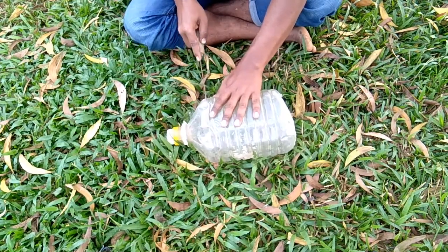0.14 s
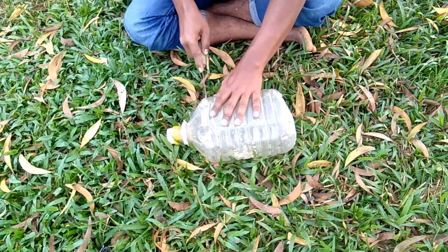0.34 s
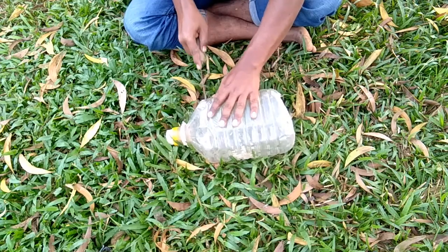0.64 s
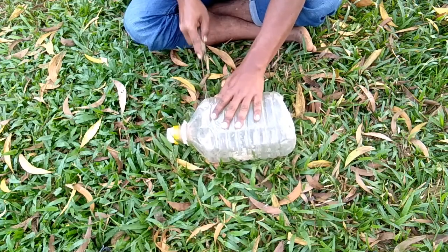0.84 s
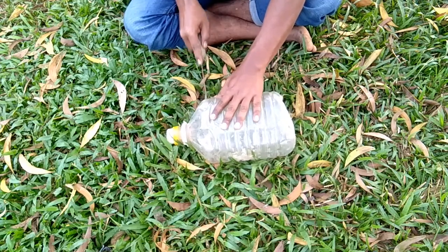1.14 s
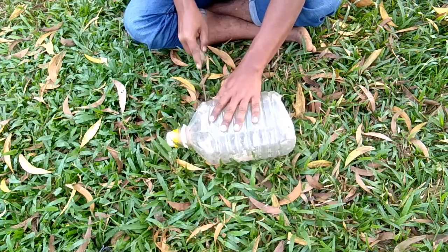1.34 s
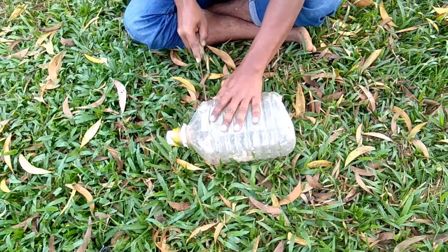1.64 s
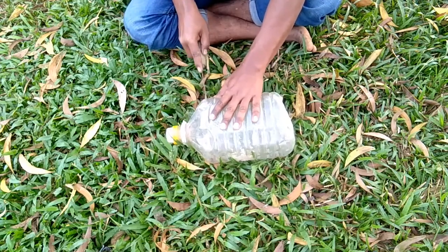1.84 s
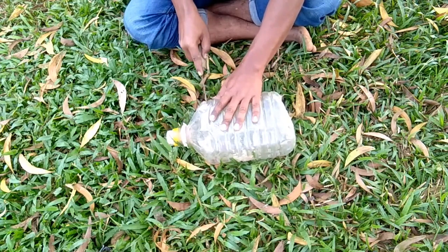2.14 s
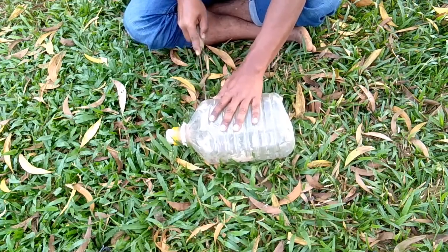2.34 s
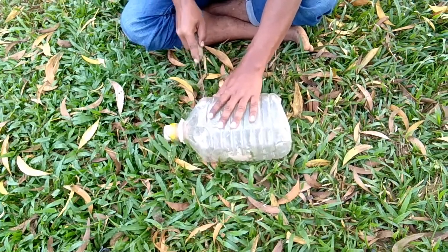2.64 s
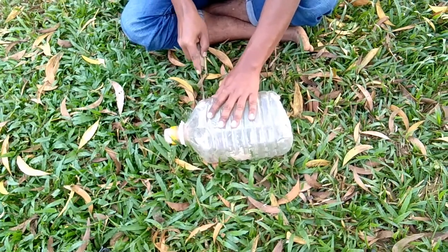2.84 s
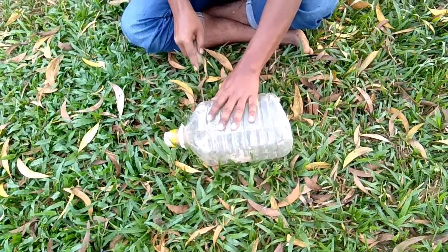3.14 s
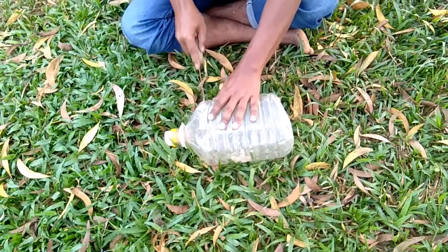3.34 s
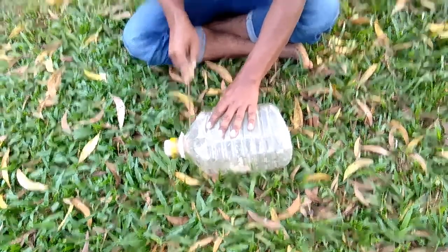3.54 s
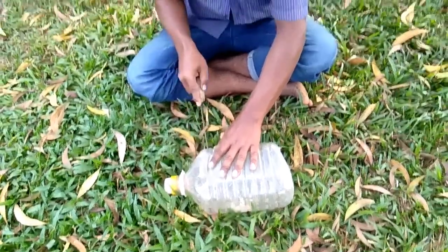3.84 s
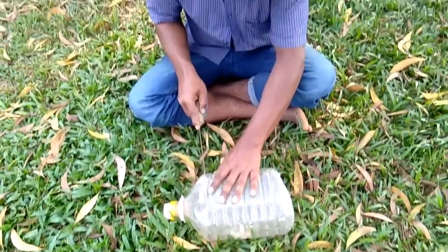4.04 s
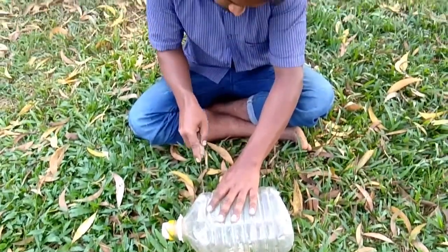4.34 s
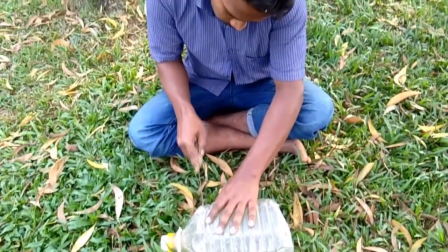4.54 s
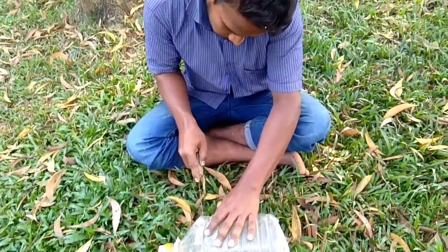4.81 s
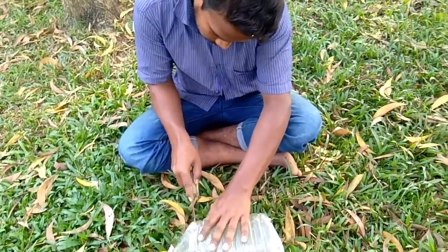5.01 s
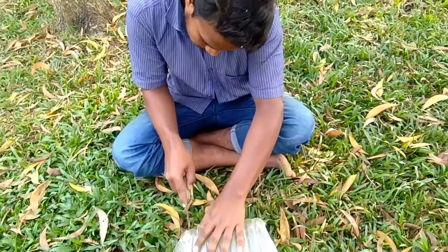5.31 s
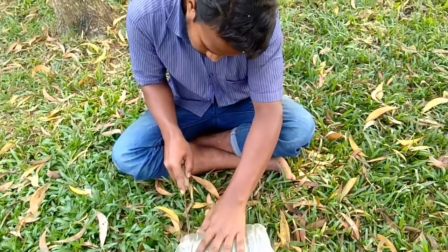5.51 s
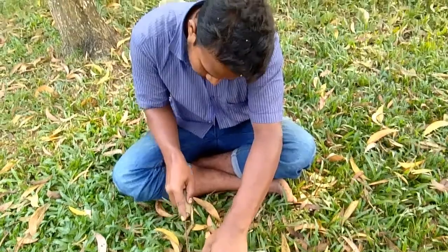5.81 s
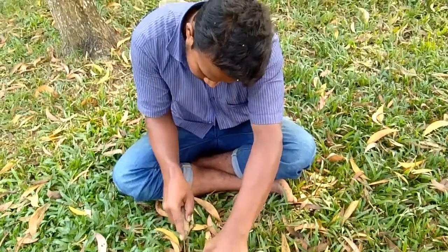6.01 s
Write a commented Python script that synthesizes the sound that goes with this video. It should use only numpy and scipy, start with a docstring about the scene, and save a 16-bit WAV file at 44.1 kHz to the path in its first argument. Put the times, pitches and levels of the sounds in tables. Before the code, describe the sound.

Close, dry rasping of saw teeth on hollow plastic, outdoors on grass. Steady to-and-fro strokes, the forward ones splintery and bright, the backward ones duller, with little snaps where the blade catches and soft boomy thuds from the hand-damped bottle. After a short pause with faint bird chirps, sawing returns, its back strokes now stronger, and is cut off mid-rhythm. Almost no echo, faint open-air hush.

```python
"""A dull scrape is already under way: a small saw blade slides back and forth through a thin plastic bottle.
A hand holds the bottle down on a lawn. Each tooth plucks the wall, which rings through filters for the bottle.
Bright cuts mostly take turns with dull returns, with ticks, chips and low thuds; the sawing rests once, half-way.
Birds, made of gliding sine tones, whistle some way off over a quiet outdoor hush of filtered noise."""
import sys
import numpy as np
from scipy import signal
from scipy.fft import rfft, irfft, next_fast_len
from scipy.io import wavfile
from scipy.ndimage import map_coordinates

SR = 44100
rng = np.random.default_rng(int(sys.argv[2]) if len(sys.argv) > 2 else 0)


def wrap_up_sound(samples):
    """Save the sound to the file named by the first command line argument, as 16-bit audio."""
    columns = np.atleast_2d(samples).T
    # keep every value between -1 and 1, then stretch to whole-number steps
    tamed = np.clip(columns, -1, 1)
    steps = np.round(tamed * 32767).astype(np.int16)
    wavfile.write(sys.argv[1], SR, steps)


N = 272097  # length in samples
USUAL_DB = -29  # push level of a stroke of middling force


def amp(db):
    """Turn decibels into a gain."""
    return 10 ** (np.asarray(db) / 20)


def unit(x):
    """Scale x to an rms of 1."""
    return x / np.sqrt(np.mean(x ** 2) + 1e-20)


def along(points, hz):
    """Read a table of (f/Hz, value) on a log frequency axis."""
    f, value = np.transpose(points)
    return np.interp(np.log(hz + 1), np.log(f), value)


def wobble(rate, size):
    """A smooth random curve through `rate` random points a second."""
    points = rng.standard_normal(int(size * rate / SR) + 4)
    return map_coordinates(points, [np.arange(size) * rate / SR])


def add(track, s, sound):
    """Mix a sound into the track at time s, dropping what falls outside."""
    first = round(s * SR)
    sound = sound[max(-first, 0):]
    part = track[max(first, 0):][:len(sound)]
    part += sound[:len(part)]  # part is a view, so this changes the track


def filtered(x, gain):
    """Multiply the spectrum of x by a gain that depends on frequency."""
    size = next_fast_len(N + SR // 2)
    hz = np.fft.rfftfreq(size, 1 / SR)
    return irfft(rfft(x, size) * gain(hz), size)[:N]


def causal(colour_db, size=4096):
    """A response of energy 1 with the given colour, its sound packed as early as possible (minimum phase)."""
    hz = np.fft.rfftfreq(size, 1 / SR)
    cepstrum = irfft(np.log(amp(colour_db(hz))))
    fold = np.r_[1, np.full(size // 2 - 1, 2), np.zeros(size // 2)]
    response = irfft(np.exp(rfft(cepstrum * fold)))
    return response / np.linalg.norm(response)


def ringing(decays, size):
    """Many random modes of equal energy, each frequency dying away at its own speed."""
    hz, t, modes = signal.stft(rng.standard_normal(size), SR, nperseg=128)
    fade = amp(-60 * t / along(decays, hz)[:, None])
    even_fade = fade / np.linalg.norm(fade, axis=1, keepdims=True)
    tail = signal.istft(modes * even_fade, SR)[1][:size]
    return tail / np.linalg.norm(tail)


# how loudly the bottle wall passes on a scrape at each pitch: f/Hz, relative level/dB
WALL_COLOUR = [(100, -34), (250, -24), (390, -2), (500, -5.5), (680, 2.5), (1300, -2.5), (1900, -2.5),
               (3400, -11), (5500, -24), (9500, -26.5), (12500, -39.5), (16000, -46.5)]
# resonances of the bottle that stand out: f/Hz, width/Hz, boost level/dB
RESONANCES = [(180, 44, 0), (367, 23, 0.5), (1117, 57, 5), (1744, 240, 4), (2800, 230, 2), (4360, 18, 5),
              (4500, 870, 3), (6110, 59, 5), (8890, 340, 1)]


def bottle(spectrum, bright_db=0, peaks=()):
    """The bottle's response for one grip and blade angle: a colour, a treble tilt and resonant bumps."""
    def colour_db(hz):
        tilt = along([(700, 0), (4000, bright_db)], hz)
        bumps = 0
        for centre, width, db in [*RESONANCES, *peaks]:
            bumps = bumps + db * np.exp(-((hz - centre) / width) ** 2)
        return along(spectrum, hz) + tilt + bumps
    return causal(colour_db)


# how long the plucked wall rings: f/Hz, time to fall by 60 dB t/s
WALL_RING = [(170, 0.049), (400, 0.091), (1000, 0.039), (3000, 0.039), (10000, 0.028)]


def pluck(crack):
    """One spot of the wall let go: a sharp crack, then its ring."""
    ring = ringing(WALL_RING, size=4096)
    ring[0] += crack
    return ring / np.linalg.norm(ring)


def teeth(speed, tooth_rate, jitter, scatter_db):
    """Sample places and sizes of the teeth passing the edge; tooth_rate is per second at speed 1."""
    travel = np.cumsum(speed) * tooth_rate / SR
    chance = rng.standard_normal((int(travel[-1]), 2))
    passing = np.arange(len(chance)) + jitter * chance[:, 0]
    at = np.searchsorted(travel, passing).clip(0, len(speed) - 1)
    size = amp(scatter_db * np.minimum(chance[:, 1], 2))
    # sparser teeth pluck harder, which keeps the overall level
    return at, unit(size) * np.sqrt(SR / (tooth_rate * speed[at]))


def rasp(force, speed, tooth_rate, scatter_db, crack, count=6):
    """Teeth pluck a few spots, each with a ring of its own; the contact moves on as the blade travels."""
    at, size = teeth(speed, tooth_rate, jitter=.3, scatter_db=scatter_db)
    stray = .55  # how far a tooth may miss its spot, in spots
    spot = np.floor(count * at / len(force) + stray * rng.standard_normal(len(at))) % count
    total = 0
    for k in range(count):
        hits = np.bincount(at, size * (spot == k), len(force))
        total = total + signal.fftconvolve(force * hits, pluck(crack))
    return total


# colour of the outdoor background: f/Hz, relative level/dB
AIR_COLOUR = [(15, -40.5), (25, -0.5), (86, 3.5), (354, -11.5), (1810, -11.5), (3010, -9), (3440, -17.5),
              (15000, -32.5)]


def air():
    """A steady, very quiet outdoor hush made of filtered noise."""
    hush = filtered(rng.standard_normal(N), lambda hz: amp(along(AIR_COLOUR, hz)))
    return amp(-75.0) * unit(hush)


# when the blade lies in the cut and rubs, also between strokes: start t/s, end t/s, level/dB
RUBS = [(0, 3.58, -58.5), (4.35, 6.17, -59)]


def rubbing():
    """The flat of the blade slides unevenly against the cut: noise coloured by the bottle."""
    t = np.arange(N) / SR
    slide = signal.fftconvolve(rng.standard_normal(N), bottle(WALL_COLOUR, bright_db=8))[:N]
    fade_db_per_s = 700
    contact = 0
    for start, end, db in RUBS:
        outside_s = np.abs(t - np.clip(t, start, end))
        contact = contact + amp(db - fade_db_per_s * outside_s)
    return contact * amp(1.1 * wobble(65, N)) * slide


def stroke_force(t, start, end, db, lean_db, arch):
    """The blade bites, the push swells to its crest, and the teeth come free."""
    crest_share, start_drop_db, end_drop_db, release_db_per_s = arch
    bite_s = 0.0035
    arch_grows = 0.046  # a harder stroke starts further below its crest: share gained per dB of push
    start_drop_db = start_drop_db * max(1 + arch_grows * (db - USUAL_DB), .5)
    u = np.clip((t - start) / (end - start), 0, 1)  # progress through the stroke
    rise = np.interp(u, [0, crest_share], [1, 0]) ** 2
    fall = np.interp(u, [crest_share, 1], [0, 1]) ** 2
    push_db = db + lean_db * (u - crest_share) - start_drop_db * rise - end_drop_db * fall
    push_db = push_db - release_db_per_s * np.maximum(t - end, 0)
    uneven_db = 0.71 * wobble(75.6, len(t))
    return amp(push_db + uneven_db) * np.minimum((t - t[0]) / bite_s, 1)


# colour of the whole bottle's slow flexing: f/Hz, relative level/dB
FLEX_COLOUR = [(30, -40.5), (75, -16), (125, -15), (175, 1.5), (250, -3.5), (390, -3), (520, -22),
               (1200, -48.5)]
# colour of tiny chips breaking from the cut edge: f/Hz, relative level/dB
CHIP_COLOUR = [(300, -40.5), (1500, 4.5), (4300, 2), (5600, -6), (7800, -0.5), (9300, 1), (11000, -5),
               (12800, -15.5), (16000, -27.5)]
# colour of the rasping cut edge: f/Hz, relative level/dB
EDGE_COLOUR = [(500, -33.5), (1400, -0.5), (2100, -0.5), (2900, -4), (3600, -17.5), (8000, -28),
               (16000, -54)]


def stroke(start, end, db, lean_db, wall_hz, wall_db, crackle_db, bright_db, arch):
    """One stroke scrapes the wall, rasps its edge, flexes the bottle and breaks off chips."""
    t = np.arange(start - .002, end + .06, 1 / SR)
    force = stroke_force(t, start, end, db, lean_db, arch)
    usual = np.sqrt(np.mean(force[t < end] ** 2))
    push = force / usual
    harder_db = db - USUAL_DB
    speed = .4 + .6 * np.sin(np.linspace(0, np.pi, len(t)))  # fastest in mid-stroke

    scrape = amp(-0.7) * rasp(force, speed, tooth_rate=950, scatter_db=5.0, crack=.22)
    wall_grows = .5  # the resonance near the blade stands out more under a hard push
    wall_db = wall_db * amp(wall_grows * harder_db)
    brightens_db_per_s = 0.93  # as the cut goes on
    wall_peak = (wall_hz, 0.15 * wall_hz, wall_db)
    wall = bottle(WALL_COLOUR, bright_db + brightens_db_per_s * start, [wall_peak])

    # the edge rasps mostly at the crest of the push, and more in harder strokes
    edge_level = amp(-11 + 0.58 * harder_db) * usual
    edge = edge_level * rasp(push ** 2.37, speed, tooth_rate=700, scatter_db=4, crack=0.28, count=2)

    # even a light push flexes the bottle, up to a limit set by the stroke's own level
    boom_db = min(-38.5 + .25 * harder_db, db - 4)
    boom = amp(boom_db) * rasp(push ** 0.5, speed, tooth_rate=900, scatter_db=2.0, crack=0.25, count=3)

    # a louder crackle also has more chips a second; most energy comes where the push is hard
    chip_rate = 560 * amp(.35 * crackle_db)
    chip_level = amp(crackle_db + 3.0) * usual
    chips = chip_level * rasp(push ** 1.46, speed, chip_rate, scatter_db=5, crack=0.49, count=4)

    parts = [(scrape, wall), (edge, bottle(EDGE_COLOUR)),
             (boom, bottle(FLEX_COLOUR)), (chips, bottle(CHIP_COLOUR))]
    return sum(signal.fftconvolve(drive, response) for drive, response in parts)


# return strokes, the backs of the teeth sliding over the edge:
# start t/s, end t/s, push level/dB, lean (extra push gained along the stroke) level/dB, wall resonance f/Hz
RETURNS = [(-.04, 0.062, -29.5, 0.5, 780), (.323, 0.449, -27.5, 0.5, 1700), (0.701, 0.828, -30, 6, 1643),
           (1.066, 1.186, -30.5, 2.5, 1610), (1.399, 1.548, -31, 3, 2700), (1.784, 1.9, -30, 2, 2530),
           (2.134, 2.267, -28, -3, 2110), (2.509, 2.634, -24.5, 3.5, 2370),
           (2.904, 3.012, -29.5, 2.5, 1620), (3.215, 3.377, -22, -4, 2530), (3.941, 3.985, -54, -1, 1060),
           (4.092, 4.199, -54.5, -1, 764), (4.236, 4.418, -29, 3, 790), (4.643, 4.756, -21.5, 2, 773),
           (5.007, 5.101, -23.5, 0, 2660), (5.341, 5.445, -20.5, -9, 2150),
           (5.681, 5.789, -23.5, -1.5, 2200), (6.043, 6.155, -26.5, 1.5, 2190)]
# cutting strokes, teeth first:
# start t/s, end t/s, push level/dB, lean level/dB, crackle relative level/dB, wall resonance f/Hz
CUTS = [(0.143, 0.219, -32, 12, -19, 2000), (0.206, .264, -24, 7, -5, 1520),
        (0.544, 0.629, -22.5, 8.5, -8, 4210), (.904, 1.014, -23.5, -0.5, -12.5, 4300),
        (1.253, 1.357, -24, 0, -15.5, 4170), (1.623, 1.717, -24, 0, -18.5, 4400),
        (1.98, 2.08, -23, -3.5, -13.5, 4500), (2.338, 2.455, -24, -1, -16.5, 4570),
        (2.733, 2.821, -26.5, 1.5, -21.5, 610), (3.058, 3.166, -24.5, 2.5, -17, 1100),
        (3.432, 3.549, -26, 5, -15.5, 2210), (4.481, 4.574, -29.5, -4, -16.5, 2190),
        (4.816, 4.932, -27.5, 9, -18, 620), (5.144, 5.274, -26, 10.5, -18, 1100),
        (5.516, 5.62, -25, 1, -19.5, 1160), (5.871, 5.973, -26, 0, -17, 1110)]
# the arch of a stroke: crest as a share of its length, drop at the start level/dB (for a middling push),
# drop at the end level/dB, release [dB per s]
RETURN_ARCH = (0.36, 6.8, 4.1, 1210)
CUT_ARCH = (.35, 7, 9.5, 620)


def sawing():
    """Bright cuts and dull returns; the teeth's plucks drive the bottle's wall, edge and body."""
    track, lead_s = np.zeros(N), .005
    for start, end, db, lean_db, wall_hz in RETURNS:
        wall_db = 1 + .9 * start  # the lengthening cut frees the wall
        sound = stroke(start, end, db, lean_db, wall_hz, wall_db,
                       crackle_db=-22, bright_db=-6.5, arch=RETURN_ARCH)
        add(track, start - lead_s, sound)
    for start, end, db, lean_db, crackle_db, wall_hz in CUTS:
        bright_db = -1.5 + 0.37 * (crackle_db + 12)  # brighter where the edge splinters
        sound = stroke(start, end, db, lean_db, wall_hz, 4, crackle_db, bright_db, CUT_ARCH)
        add(track, start - lead_s, sound)
    return track


# catches of the blade, where the wall snaps back: t/s, relative level/dB, relative splinter level/dB
SNAGS = [(0.114, -37, -38), (0.156, -21, -13.5), (0.313, -31, -5.5), (0.336, -20.5, -22), (0.347, -31, -20),
         (0.502, -16.5, -8), (0.546, -13, -15), (0.908, -12, -28), (1.07, -18, -31), (1.261, -21, -9.5),
         (1.603, -34, -45), (1.78, -22, -27), (2.13, -21, -24), (2.491, -18, -33), (2.712, -15.5, -21),
         (2.731, -10, -17.5), (2.883, -18.5, -21), (3.544, -12.5, -16), (3.932, -30.5, -51),
         (4.112, -34.5, -45), (4.234, -27, -29), (4.257, -27, -10), (4.458, -27.5, -60), (4.486, -23, -6.5),
         (4.557, -21, -17), (4.73, -19.5, -7), (4.815, -13.5, -27.5), (4.989, -20, -23), (5.149, -13, -23),
         (5.318, -29, -24), (5.357, -34, -21.5), (5.501, -19.5, -28), (5.848, -13.5, -20.5),
         (6.041, -21.5, -18)]


def snags():
    """A caught tooth bends the wall, which snaps back with a hollow tick as the next teeth skip past."""
    track, t = np.zeros(N), np.arange(SR // 40) / SR
    skip_t60 = 0.027  # seconds for the skipping to fall by 60 dB
    for s, db, treble_db in SNAGS:
        boom_db = -11.5 - 0.46 * (db - USUAL_DB)  # the flexing's share falls as the catch gets harder
        skip_force = amp(-60 * t / skip_t60)
        skips = 0.029 * rasp(skip_force, np.ones(len(t)), tooth_rate=1200, scatter_db=2.5, crack=0.24, count=2)
        add(skips, 0, 0.77 * pluck(crack=0.37))
        # more splintering also brightens the wall
        wall = bottle(WALL_COLOUR, bright_db=0.52 * (treble_db + 22.0))
        flex = amp(boom_db + 6.5) * bottle(FLEX_COLOUR)
        chips = amp(treble_db + 3) * bottle(CHIP_COLOUR)
        add(track, s, amp(db + 18.5) * signal.fftconvolve(skips, wall + flex + chips))
    return track


# bird notes, each one glide: start t/s, end t/s, first f/Hz, last f/Hz, level/dB, hoarseness (0 is pure)
BIRDS = [(0.121, .16, 4400, 4950, -53, 1.1), (0.268, 0.317, 3130, 2950, -56, 0.2),
         (1.0, 1.05, 3680, 3560, -59, .15), (1.199, 1.234, 4150, 4450, -53, 0.5),
         (1.227, 1.254, 4400, 3170, -54, .15), (1.928, 1.97, 3720, 4660, -62.5, .15),
         (3.64, 3.719, 2380, 2600, -72.5, 0.1), (3.725, 3.823, 2620, 3030, -74, .05),
         (3.839, 3.925, 2980, 3250, -91, .1), (4.111, 4.228, 2780, 3310, -60.5, 0.7),
         (4.423, 4.48, 2510, 2710, -57, 0.7)]


def birds():
    """Thin gliding whistles: sine tones whose fast random quaver makes some of them hoarse."""
    track = np.zeros(N)
    for start, end, first_hz, last_hz, db, hoarse in BIRDS:
        size = round((end - start) * SR)
        quaver = .08 * hoarse * wobble(900, size)
        glide = np.linspace(1, 0, size) ** 1.9  # slides fast at first, then settles
        pitch = (last_hz + (first_hz - last_hz) * glide) * (1 + quaver)
        level = amp(db) * signal.windows.tukey(size, .35)
        whistle = np.sin(2 * np.pi * np.cumsum(pitch) / SR)
        add(track, start, np.sqrt(2) * level * whistle)
    return track


# dull thuds as the whole side of the bottle gives way: t/s, f/Hz, level/dB before attack and decay
THUDS = [(0.546, 205, -23), (1.256, 197, -25), (2.713, 220, -21.5), (3.434, 175.4, -16),
         (3.934, 180, -30.5), (4.76, 205, -25.5), (5.099, 189, -26.5)]


def thuds():
    """The broad side swings at a low pitch for a few cycles, damped by the hand."""
    track, t = np.zeros(N), np.arange(SR // 5) / SR
    attack_s, t60 = .005, .09
    for s, hz, db in THUDS:
        swell = 1 - np.exp(-t / attack_s)
        decay = amp(db - 0.5 - 60 * t / t60)
        add(track, s, decay * swell * np.sin(2 * np.pi * hz * t))
    return track


# the answer of trees and ground: f/Hz, time to fall by 60 dB t/s
GARDEN = [(200, 0.11), (2000, 0.043), (10000, 0.12)]


def outdoors(x, wet_db):
    """Add the faint scatter of sound from trees and ground."""
    scatter = signal.fftconvolve(x, ringing(GARDEN, size=16384))[:N]
    return x + amp(wet_db) * scatter


def scene():
    """The saw close by, the birds farther away with more scatter, and the hush."""
    saw = rubbing() + sawing() + snags() + thuds()
    return (air() + outdoors(saw, wet_db=-22) + outdoors(birds(), wet_db=-6.0))[None]


def record(dry):
    """The microphone keeps nothing above its band limit."""
    top_hz = 15900
    return np.array([filtered(channel, lambda hz: hz < top_hz) for channel in dry])


dry = scene()
out = record(dry)
wrap_up_sound(out)
```